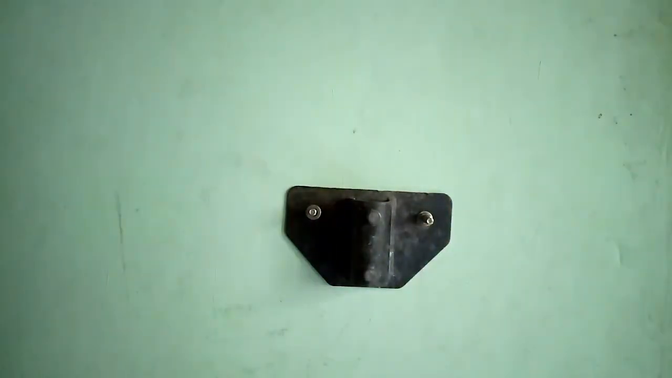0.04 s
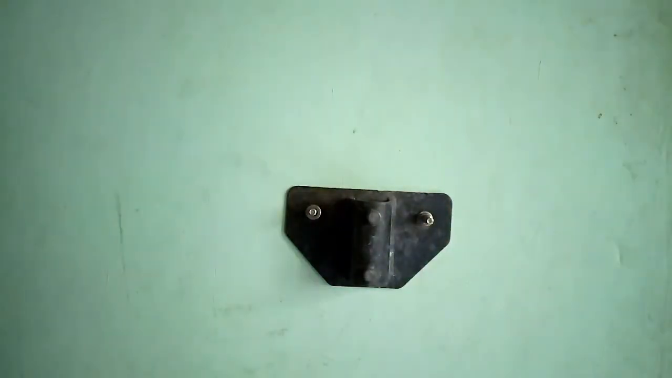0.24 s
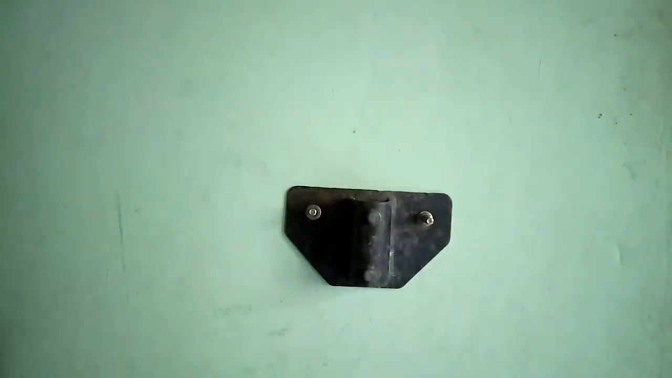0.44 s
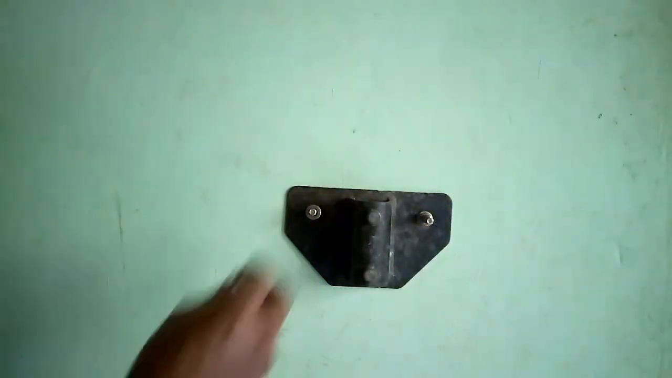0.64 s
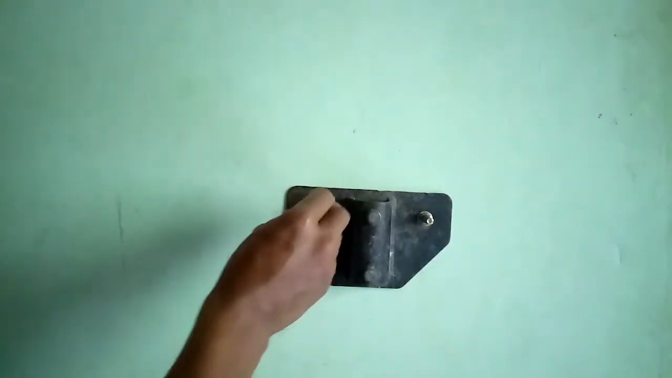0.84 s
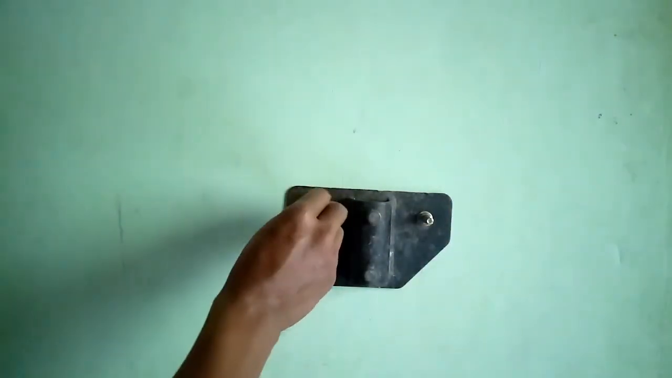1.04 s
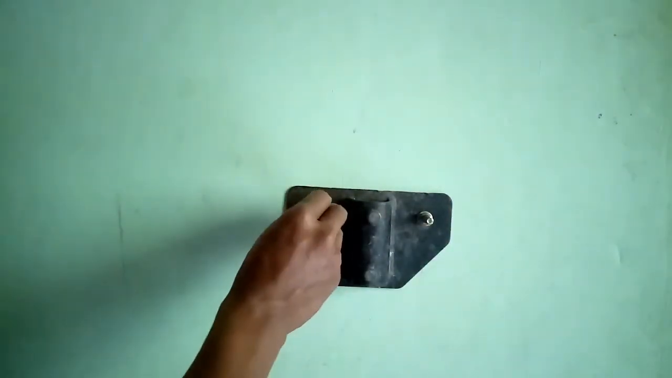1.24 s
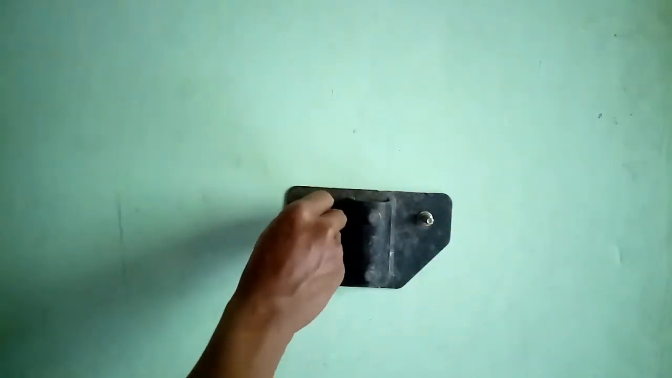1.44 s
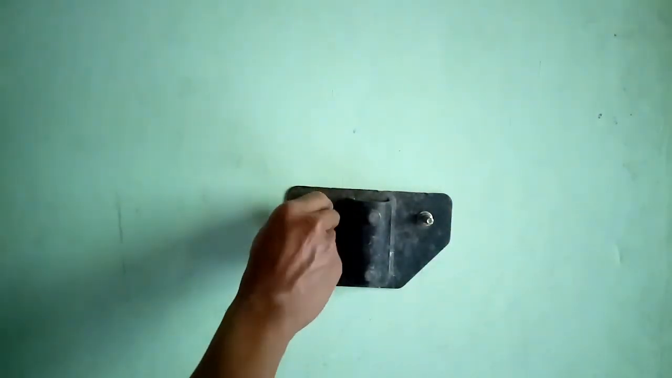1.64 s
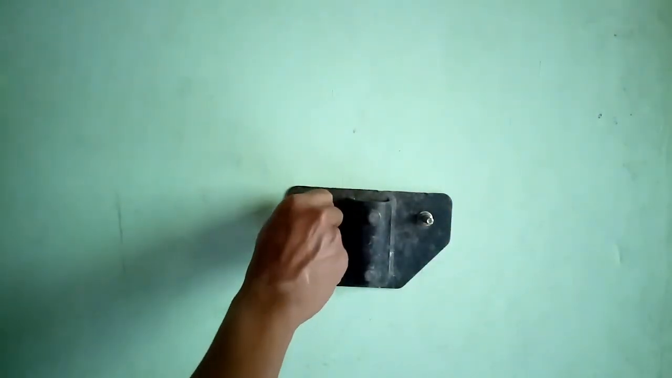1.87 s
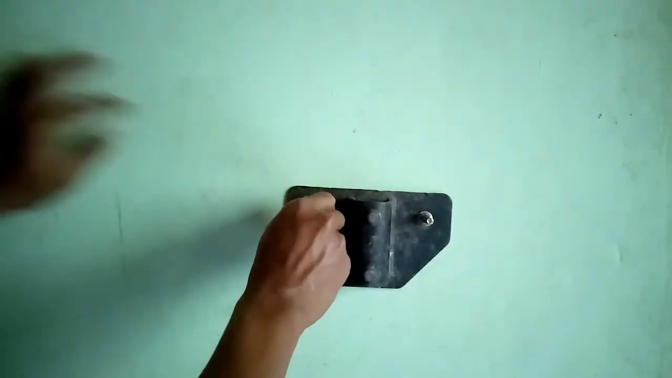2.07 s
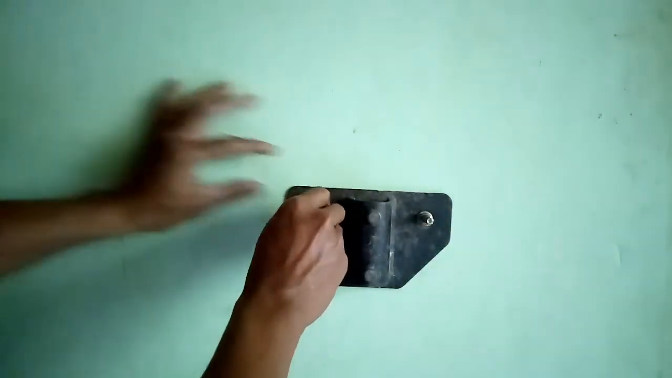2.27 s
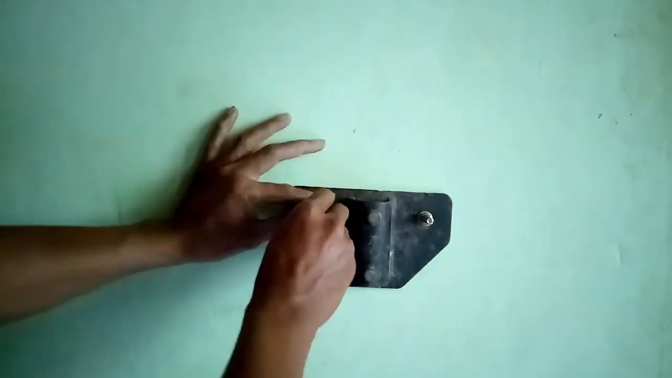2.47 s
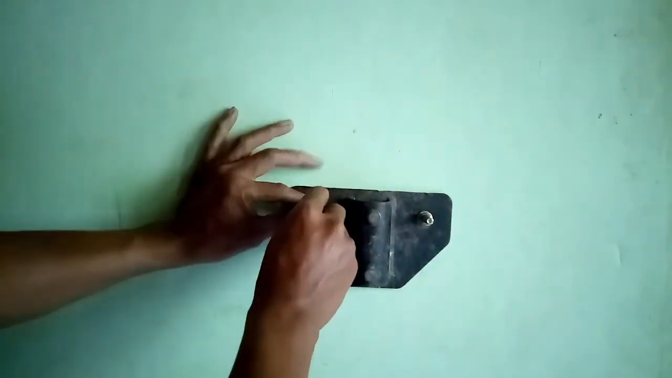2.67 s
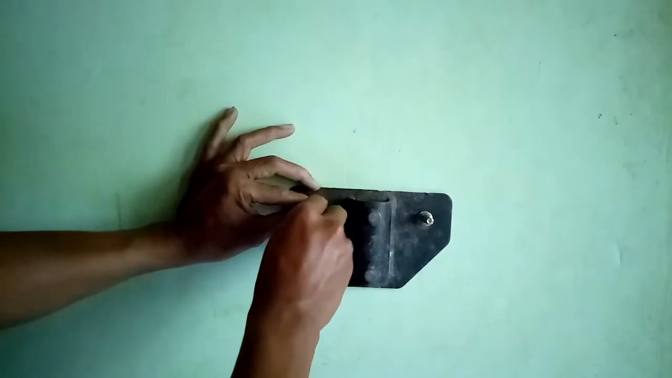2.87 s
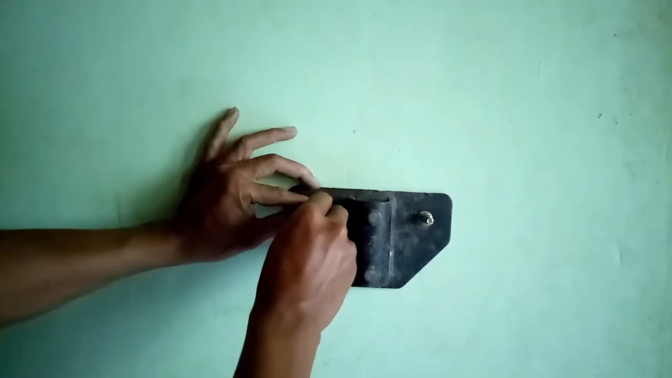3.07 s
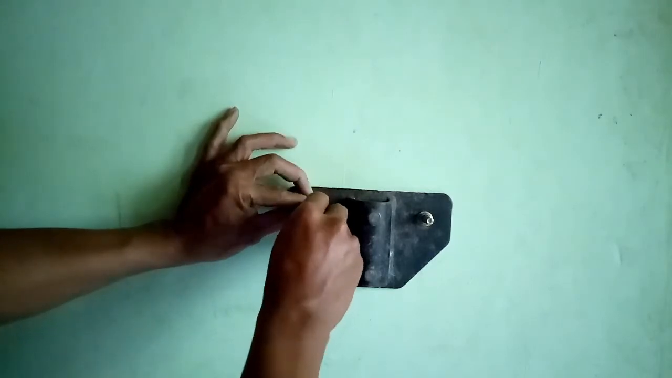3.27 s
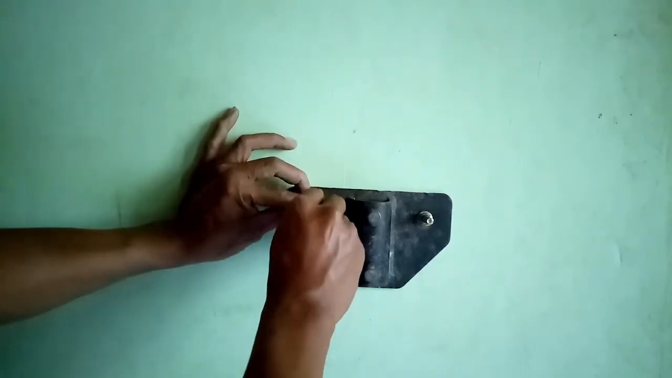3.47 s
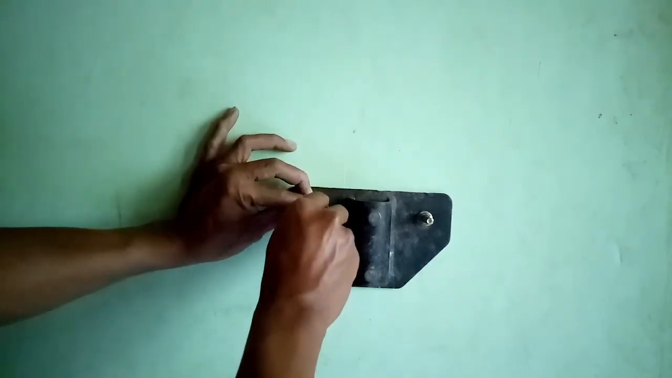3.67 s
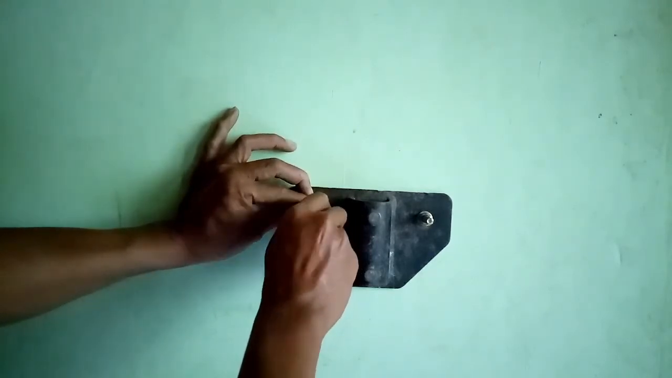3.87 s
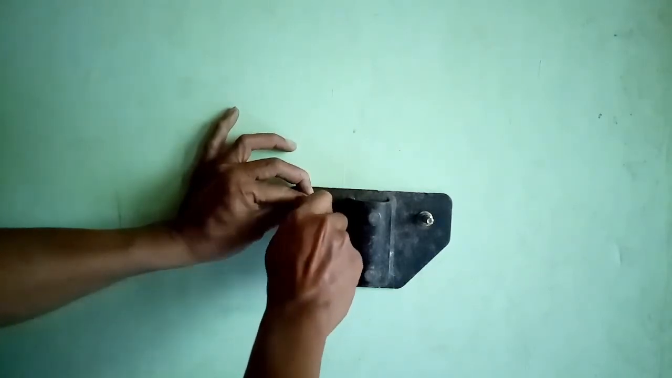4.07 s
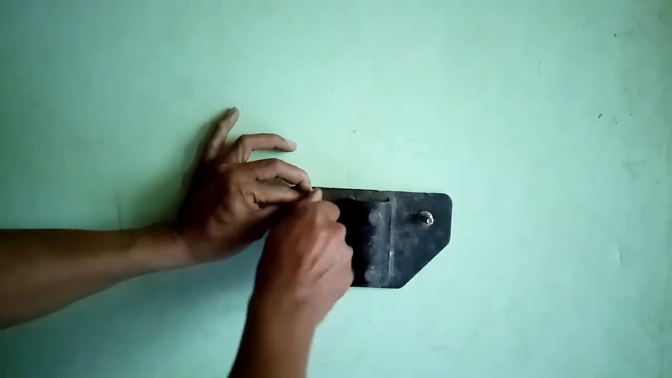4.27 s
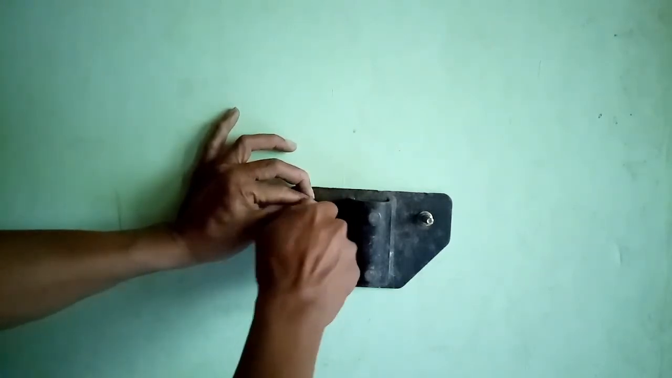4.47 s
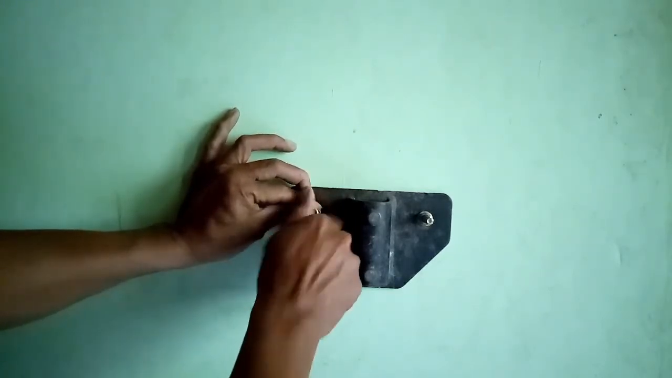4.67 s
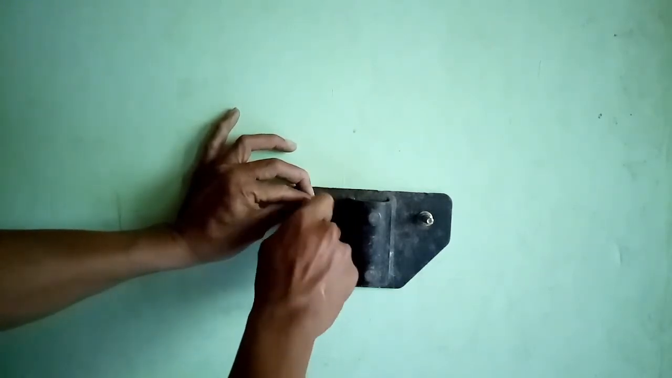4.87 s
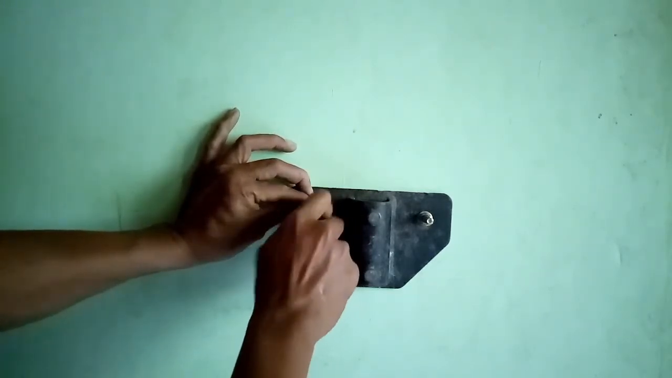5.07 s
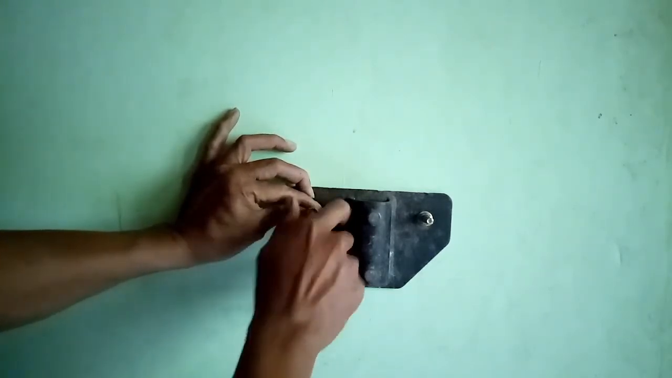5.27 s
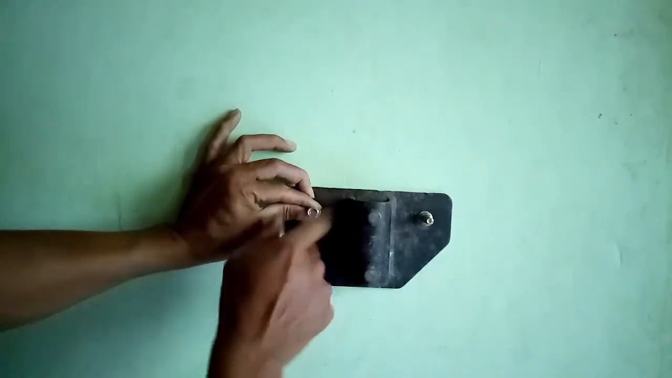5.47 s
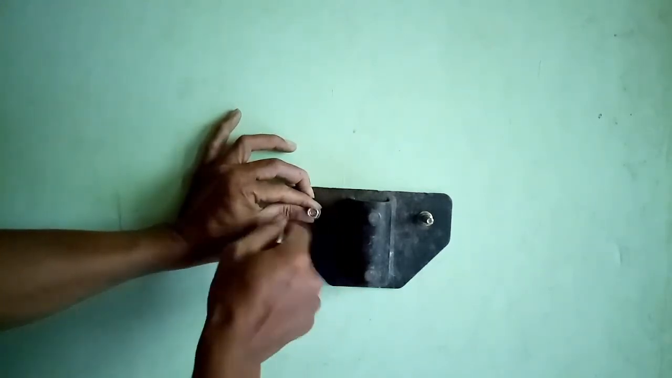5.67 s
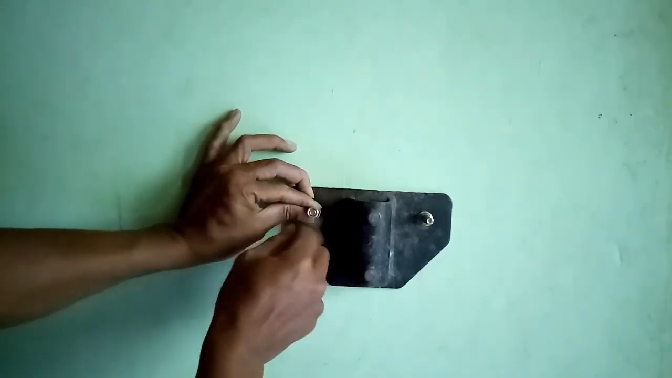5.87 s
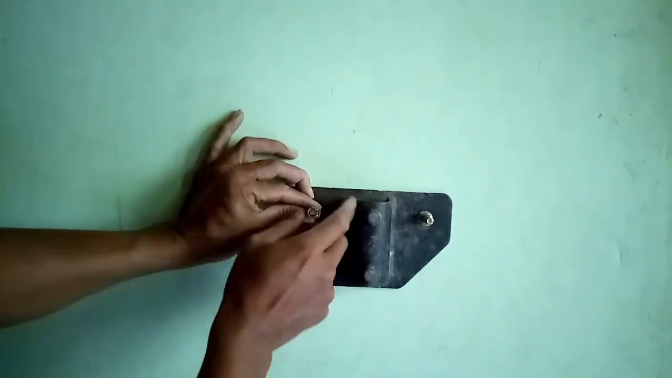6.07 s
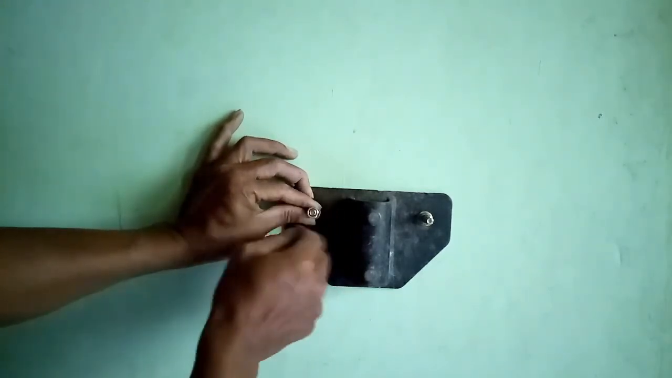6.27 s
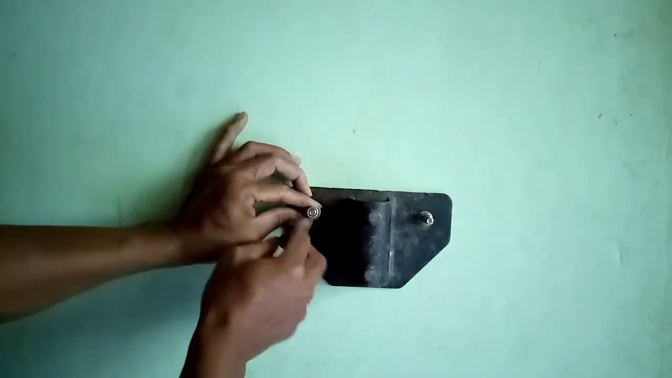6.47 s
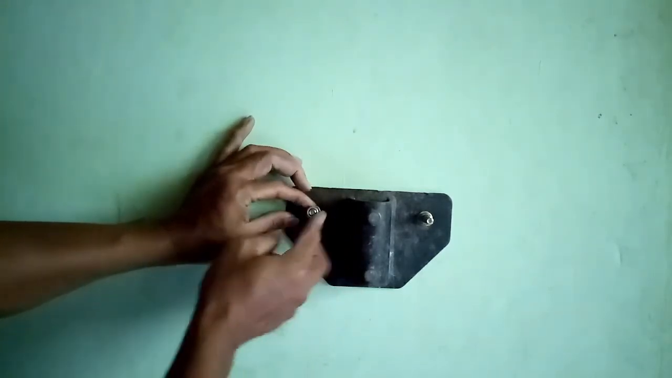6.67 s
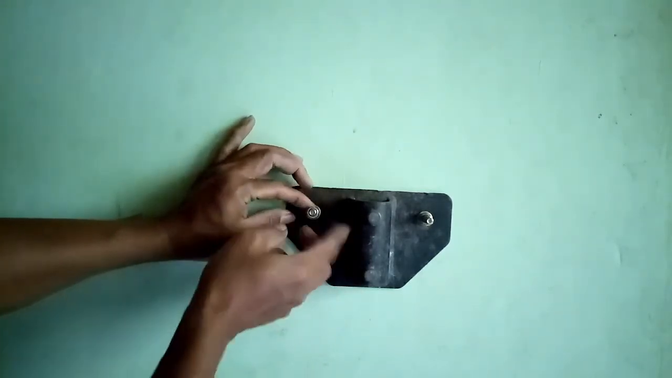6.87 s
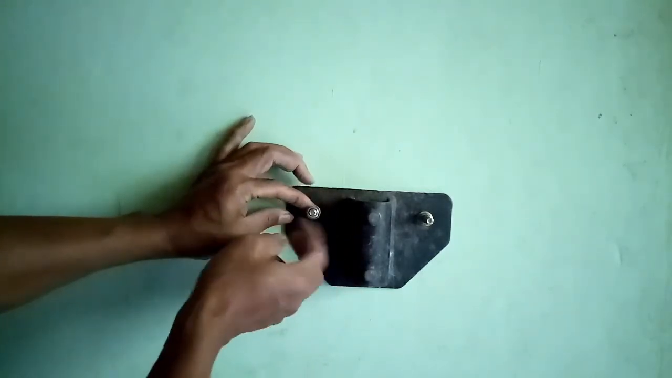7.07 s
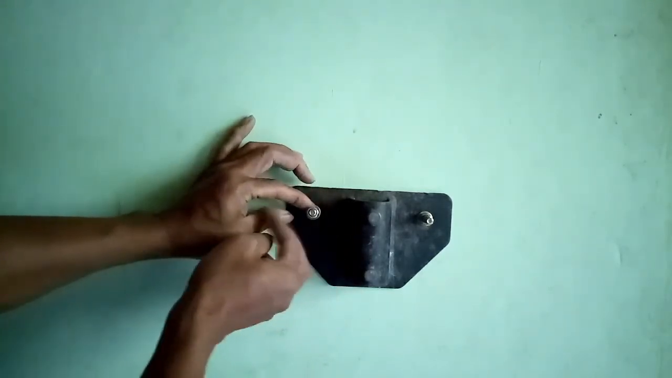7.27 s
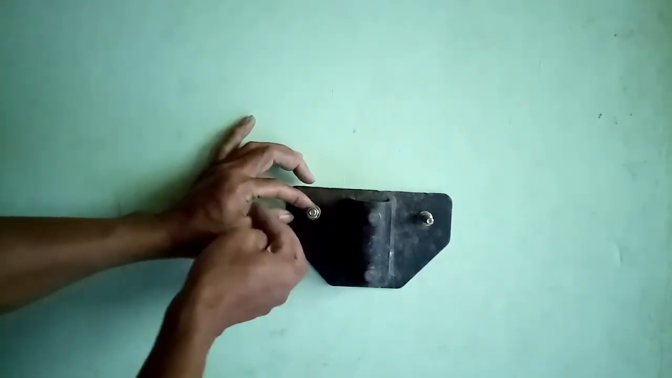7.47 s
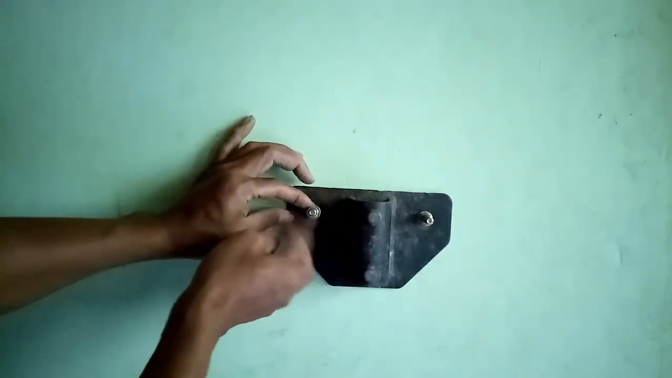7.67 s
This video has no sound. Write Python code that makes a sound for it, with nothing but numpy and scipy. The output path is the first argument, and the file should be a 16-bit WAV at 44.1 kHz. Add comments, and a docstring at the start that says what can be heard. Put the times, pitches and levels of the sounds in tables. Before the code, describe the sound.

A nut is worked by hand onto a bolt on a steel wall plate, in a bare room with a faint steady hush and short reverberation. From about 0.8 seconds, light, irregular clinks sound as the nut meets the bolt tip, with a clearer one at 1.1 and faint finger rubbing in between. Each hit is a dry clack with a brief, high steel ring. Two sharp, loud clacks land at 3.1 and 3.4 seconds. A faint, muffled low drone swells near 3.8 and more weakly near 4.4, among a few smaller clicks. From 5 seconds to the end, around 7.7, the nut is flicked along the thread: finger ticks alternate with very short rattles, strongest near 5.5, 6, 7.1, 7.3 and 7.5 seconds. After 6.7 they crowd closer together and carry a thin, very high shimmer.

```python
"""A nut on an anchor bolt

In a bare, quiet room a nut is worked by hand onto a bolt that holds a steel plate to a wall. It clinks
against the tip as fingers rub the steel; then it is flicked along the thread: a tick as the finger
catches it, and a rattle whose blows come faster and harder. Each impact gives a damped clack and
excites the modes of the steel. A low muffled drone swells twice."""
import sys
import numpy as np
from scipy import signal
from scipy.fft import rfft, irfft
from scipy.io import wavfile
from scipy.ndimage import uniform_filter1d

SR = 44100
rng = np.random.default_rng(int(sys.argv[2]) if len(sys.argv) > 2 else 0)


def unload_wav(signal):
    """Save mono or channel-first audio to the path in sys.argv[1] as 16-bit WAV at rate SR, clipped to [-1, 1]."""
    wavfile.write(
        sys.argv[1],
        SR,
        np.round(np.clip(np.atleast_2d(signal).T, -1, 1) * 32767).astype(np.int16),
    )


N = 340893
LEAD_S = .02  # time left for the faint swell of noise that softens the start of each blow
THREADED_S, SPINNING_S = 4.0, 6.7  # the nut has caught the thread; it spins freely

# The nut feels for the thread. Each row: time in seconds, level in dB, chatter time in seconds, contact
# pitch in Hz, then in dB the colour at 6, 9 and 11.6 kHz, the relative ring and the resonance height.
CLINKS = [(0.85, -31.5, 0.0076, 5560, 5.5, -12, 4, -18, 8),
          (1.1237, -8, 0.0023, 3225, -6, -23, -27, -28, 15.5),
          (1.207, -17.5, 0.0049, 3220, -18, -27, -40, -17, 13),
          (1.438, -25.5, .004, 4750, 7, -6.5, 2, -5, -6),
          (1.456, -14.5, 0.013, 3950, -11, -23, -20, -15, 5),
          (1.513, -27.5, .0023, 3420, 8.5, -23, -14, -14, 13),
          (2.033, -22.5, 0.0012, 4200, -6, -13, -3, -6, 8), (2.228, -26, 0.0014, 4800, 7.5, -6, 6, -6, 5),
          (2.595, -15.5, 0.0019, 4200, 4.5, -6, -24.5, -3, 6.5),
          (2.615, -15, 0.00095, 4270, 1, -10, 4, -8.5, 7), (2.928, -37, 0.0013, 5300, 9.5, -9.5, 3, -5, 3),
          (3.078, -17, .001, 4020, -2, -9, -31, -32, 10),
          (3.0943, 5.5, 0.00072, 4180, 1.5, -3, -11, -5.5, 5),
          (3.382, -0.5, 0.0018, 2640, -6.5, -14.5, -15.5, -32, 2.5),
          (4.136, -37.5, 0.0013, 2940, -26, 3, -1, -1, 15),
          (4.3078, -11, 0.00033, 4260, 2.5, -2, -10, -12, 0.5),
          (4.528, -14, 0.0016, 3400, 2, -20, -11, -10, -3.5),
          (4.642, -28, .0028, 3770, -3, -26, -24, -4, 14),
          (4.722, -29.5, 0.0037, 3700, 9, -13, -21, -4, 16)]
def nut(tail_count=5, size=18000):
    """Impact excitation: every clink, tick and rattle is a clack plus the free vibration of the steel."""
    since, hz = np.arange(size) / SR - LEAD_S, np.fft.rfftfreq(size, 1 / SR)
    _, tip_db, thread_db, _ = np.transpose(STEEL_MODES)
    tip = steel_ring(since, hz, tip_db, hollow=0.12)
    thread = steel_ring(since, hz, thread_db, hollow=0.39)
    groups = np.zeros((tail_count, N))  # contacts take turns among five room tails, so no pitch stands out
    for k, (s, *strike) in enumerate([*CLINKS, *ticks(), *rattles()]):
        clack, ring = contact(since, hz, *(thread if s > THREADED_S else tip), *strike)
        if s > SPINNING_S:
            ring = ring + shiver(clack, since, hz)
        add(groups[k % tail_count], s - LEAD_S, clack + ring)
    return sum(room(group) for group in groups)

# A finger catches the nut. Each row: time in seconds, level in dB, chatter time in seconds,
# contact pitch in Hz, colour in dB at 6 kHz and at 11.6 kHz.
TICKS = [(5.052, -9, 0.0014, 3160, -9, -33), (5.281, -22.5, 0.0011, 2500, 0, -34),
         (5.412, -15.5, .002, 3770, 1, -34), (5.5678, -3, 0.00048, 2530, -1, -4),
         (5.675, -3, 0.0005, 2440, -4.5, -5), (5.738, -19.5, 0.00089, 2410, 0.5, -16),
         (5.922, -21, 0.0043, 2580, 2, -52), (6.2264, -7, 0.001, 3190, -1.5, -8.5),
         (6.4995, -1.5, 0.0022, 2980, -2.5, -10.5), (6.741, -13.5, 0.0037, 3430, 1.5, 1.5),
         (7.0123, -7, .0004, 3380, 0.5, -5.5), (7.2527, -12.5, 0.0011, 2500, 5, -6),
         (7.4061, -4.5, 0.00027, 2130, -0.5, 2), (7.4852, -10.5, 0.0015, 2550, 6, 3),
         (7.7235, -6, 0.00034, 2980, 0.5, 5)]
def ticks():
    """Impulsive excitation: each catch of the finger is a single blow on the thread."""
    for tick in TICKS:
        yield on_thread(*tick, hump_db=3, full_ring_db=-13)

# The flicked nut rattles. Each row: time of the hardest blow in seconds, its level in dB,
# run-up in seconds, contact pitch in Hz, colour in dB at 6 kHz and at 11.6 kHz.
RATTLES = [(5.096, -11.5, 0.0077, 2120, -4, -26), (5.1509, -7.5, .018, 2270, -4, -22),
           (5.471, 2.5, 0.032, 2040, -1.5, -5.5), (5.9887, 3.5, 0.02, 1940, -0.5, -3),
           (6.2714, -6.5, 0.011, 2350, -2.5, -10), (6.801, -3.5, 0.022, 2220, 1.5, -0.5),
           (7.082, 1.5, 0.017, 1800, -0.5, -2), (7.2878, 1, .009, 1990, 3, -2),
           (7.5209, 2, .017, 2200, -0.5, -3)]
def rattles(growth_db=11.5, jitter_s=.0005, chatter_s=0.003, soft_pitch_rise=0.17):
    """Repeated impact: three blows come closer and harder, the softer ones resonating higher."""
    for s, level_db, run_up, pitch_hz, treble_db, zing_db in RATTLES:
        for to_go in (1, 0.37, 0):  # share of the run-up still ahead
            at = s - to_go * (run_up + jitter_s * rng.standard_normal())
            blow_db = level_db - growth_db * np.sqrt(to_go)
            blow_hz = pitch_hz * (1 + soft_pitch_rise * to_go)
            yield on_thread(at, blow_db, chatter_s, blow_hz, treble_db, zing_db,
                            hump_db=-3.5, full_ring_db=-12.5)

def on_thread(s, level_db, chatter_s, pitch_hz, treble_db, zing_db, hump_db, full_ring_db):
    """Nonlinear contact: the harder a blow on the thread, the smaller the share of ring to clack."""
    top_db = -14 + 0.17 * zing_db
    ring_db = full_ring_db - 0.5 * level_db
    return s, level_db, chatter_s, pitch_hz, treble_db, top_db, zing_db, ring_db, hump_db

def contact(since, hz, steel, hollow_db, level_db, chatter_s, pitch_hz, treble_db, top_db, zing_db,
            ring_db, hump_db, clack_t60=0.028):
    """Source and filter: one blow gives a clack, damped at once by the fingers, and a longer ring."""
    knock = rng.standard_normal(len(since)) * gain_of(-60 * (since + LEAD_S) / clack_t60)
    clack = signal.fftconvolve(contact_force(since, chatter_s), knock)[:len(since)]
    clack = unit_rms(clack) / np.sqrt(len(since))
    # the contact resonates just above its pitch and moves lower modes poorly
    octaves = np.log2((hz + 1) / pitch_hz)
    below = np.maximum(-octaves, 0)
    low_cut_db = np.maximum(-(44 + 4 * max(hump_db, 0)) * below, -23 - 7 * below)
    peak_db = hump_db * np.exp(-((octaves - .16) / .17) ** 2)
    # the treble steps down above 7 kHz and rises again where loose metal shivers
    colour_db = curve_at([(5200, 0.0021), (6000, treble_db), (6950, treble_db),
                          (7500, top_db - 1.5), (8300, top_db - 3), (10200, top_db - 1.5),
                          (11600, zing_db), (12600, zing_db - 12), (15000, zing_db - 27)], hz)
    clack = irfft(rfft(clack) * minimum_phase(colour_db + low_cut_db + peak_db + hollow_db))
    ring = irfft(steel * minimum_phase(0.96 * colour_db - 12 * below)) * gain_of(ring_db - 6)
    return gain_of(level_db) * clack, gain_of(level_db) * ring

def contact_force(since, chatter_s, bounces_per_s=4000, swell_s=0.0062):
    """Contact chatter: an impulse, its start softened by a faint swell of noise, then tiny rebounds."""
    age = np.maximum(since, 0) / chatter_s
    envelope = .45 * age * np.exp(1 - age) + 0.073 * np.exp(-abs(since) / swell_s)
    force = envelope * sparse_noise(len(since), bounces_per_s)
    force[np.argmin(abs(since))] = 1
    return force

# Modes of nut, bolt and plate. Each row: frequency in Hz, level in dB with the nut on the bolt's tip,
# level in dB with it on the thread, time to decay by 60 dB in seconds.
STEEL_MODES = [(899, -20, -7, .4), (1660, -25, -3, .25), (2133, 3, -2, .3), (2350, 4, -5, .2),
               (2635, -18, -1, .45), (2964, -20, -4, .45), (3007, -2, -6, .26), (3112, -22, -1, .45),
               (3478, -16, -4, .45), (4141, -9, 0, .45), (4543, 2, -7, .3), (4680, -5, -9, .45),
               (4759, -3, -5, .5), (5215, -1, -2, .45), (5781, -14, -3, .5), (6060, -5, -2, .45),
               (6379, -4, -12, .35), (6860, -9, -6, .4), (7930, -7, -8, .35), (8590, -6, -5, .35),
               (9459, -3, -4, .4), (9805, 3, 6, .33), (10126, -5, -5, .4), (10330, -5, -10, .3),
               (11120, 0, 1, .32), (11930, -7, -12, .25), (13450, -2, -14, .25)]
def steel_ring(since, hz, mode_db, hollow, width_hz=70):
    """Modal superposition: the spectrum of the damped modes, and the colour in dB they lend a clack."""
    mode_hz, _, _, t60 = np.transpose(STEEL_MODES)[:, :, None]
    after, mode_db = np.maximum(since, 0), mode_db[:, None]
    ring = (gain_of(mode_db - 60 * after / t60) * np.sin(2 * np.pi * mode_hz * after)).sum(0)
    peaks = gain_of(mode_db) / (1 + ((hz - mode_hz) / width_hz) ** 2)
    crowding = (peaks.sum(0) + 0.047) ** hollow
    crowding /= crowding[(hz > 3000) & (hz < 7000)].mean()
    return rfft(ring / np.linalg.norm(ring)), 10 * np.log10(crowding)

def shiver(clack, since, hz, centre_hz=11600, width_hz=260, t60=0.51):
    """Narrow-band resonance: loose metal on the thread keeps shivering after a clack."""
    tail = rng.standard_normal(len(since)) * gain_of(-60 * np.maximum(since, 0) / t60)
    band = 1 / (1 + 1j * (hz - centre_hz) / width_hz) ** 2
    return gain_of(-7) * irfft(rfft(clack) * rfft(tail / np.linalg.norm(tail)) * band)

# Spectrum of the grinding thread. Each row: frequency in Hz, relative level in dB.
SCRAPE_COLOUR = [(500, -23.5), (900, -15.5), (1150, -14.5), (1450, -4.5), (1700, 4.5), (1950, -2),
                 (2600, 10), (4000, 12), (6500, -17.5), (7600, -28), (11500, -25), (15000, -38)]
def scrape(grains_per_s=1800, lead_s=0.05, length_s=0.12, relative_db=-50.5):
    """Sliding friction: the thread grinds in fine grains as the nut spins, swelling with each rattle."""
    grains = coloured(sparse_noise(N, grains_per_s), SCRAPE_COLOUR)
    spins = [(s - lead_s, length_s, db + relative_db) for s, db, *_ in RATTLES]
    return swells(spins, peak=0.4, sharpness=2) * grains

# Fingers stroke the steel. Each row: start in seconds, length in seconds, relative level in dB.
STROKES = [(.25, 0.53, -66), (.79, 0.11, -53), (1.42, 0.1, -50.5), (1.95, 0.26, -47), (2.15, 0.76, -54),
           (2.6, 0.095, -57.5), (4.42, 0.35, -57.5), (4.95, 0.38, -61.5)]
# Spectrum of the rubbing. Each row: frequency in Hz, relative level in dB.
RUB_COLOUR = [(1500, -22.5), (3000, -14.5), (4000, -7), (4450, -3), (4900, -7), (6200, 5), (7000, -1),
              (8200, -22), (11800, -11.5), (15000, -39)]
def fingers(grains_per_s=1500, shift_db=4):
    """Stick-slip friction: skin and thread catch in tiny grains, whose resonances shift with the grip."""
    grains = (rng.random(N) < grains_per_s / SR) * rng.choice([-1, 1], N)
    spectra = signal.stft(grains, SR, nperseg=512)[2]
    patches = uniform_filter1d(rng.standard_normal(spectra.shape), size=4, axis=0)
    patches = unit_rms(uniform_filter1d(patches, size=12, axis=1))  # smooth in frequency and time
    grains = signal.istft(spectra * gain_of(shift_db * patches), SR, nperseg=512)[1][:N]
    pressure = swells(STROKES, peak=0.4, sharpness=1.1)
    return gain_of(-13.5) * pressure * coloured(grains, RUB_COLOUR)

def rubbed_steel(grains, ring_db=-10, size=18000):
    """Forced vibration: rubbing also sets the modes of the steel ringing faintly."""
    since, hz = np.arange(size) / SR, np.fft.rfftfreq(size, 1 / SR)
    tip_db = np.transpose(STEEL_MODES)[1]
    ring, _ = steel_ring(since, hz, tip_db, hollow=0)
    return grains + gain_of(ring_db) * signal.fftconvolve(grains, irfft(ring))[:N]

# Faint, brief tones as the steel is rubbed and handled.
# Each row: start in seconds, length in seconds, pitch in Hz, level in dB.
HANDLING_TONES = [(.3, 0.17, 6070, -74), (0.365, .19, 1710, -69), (.84, 0.15, 5930, -70.5),
                  (1.42, 0.15, 10040, -69.5), (1.64, 0.14, 4370, -73.5), (1.95, 0.32, 1547, -65),
                  (2.42, 0.13, 4500, -72), (2.59, 0.18, 11300, -73), (4.27, 0.14, 2670, -64),
                  (4.58, 0.17, 4330, -64), (4.8, .26, 4150, -74), (4.84, 0.18, 2470, -75.5),
                  (4.98, 0.26, 893, -70.5), (5.06, 0.13, 1690, -64)]
# The hands bump softly. Each row: start in seconds, length in seconds, pitch in Hz, level in dB.
BUMPS = [(.33, 0.12, 263, -70.5), (6.19, 0.11, 307, -72.5), (7.29, .14, 340, -66)]
def handling(rows, width_hz):
    """Narrow-band noise: each row is a brief, fuzzy tone that swells and fades."""
    out, hz = np.zeros(N), np.fft.rfftfreq(SR, 1 / SR)
    for s, length, pitch_hz, db in rows:
        band = rfft(rng.standard_normal(SR)) / (1 + ((hz - pitch_hz) / width_hz) ** 2)
        tone = unit_rms(irfft(band)[:int(length * SR)])
        add(out, s, gain_of(db) * tone * np.hanning(len(tone)))
    return out

# The muffled drone swells. Each row: start in seconds, length in seconds, level in dB.
DRONE_SWELLS = [(3.61, 0.33, -50.5), (3.85, 0.52, -76), (4.24, 0.35, -62)]
# Spectrum of the drone. Each row: frequency in Hz, relative level in dB.
DRONE_COLOUR = [(30, -24.5), (110, -32), (185, -12.5), (210, -6.5), (235, 0), (265, 0), (285, -20),
                (340, -21), (600, -60)]
def drone(steadiness=0.45):
    """Envelope fluctuation: a narrow band of low noise flutters, partly steadied, as it swells."""
    band = coloured(rng.standard_normal(N), DRONE_COLOUR)
    flutter = np.sqrt(abs(uniform_filter1d(band ** 2, size=2200)) + 1e-9)
    return swells(DRONE_SWELLS, peak=0.47, sharpness=1.53) * unit_rms(band / flutter ** steadiness)

# Decay of the bare room. Each row: frequency in Hz, reverberation time in seconds.
ROOM_T60 = [(500, 0.61), (2500, 0.48), (5000, 0.48), (7000, 0.41), (11000, 0.24), (15000, 0.25)]
def room(x, wet_db=-6.0, gap_s=0.00032, build_s=0.00045):
    """Reverberation: bare walls return dense reflections, each band dying at its own rate."""
    hz, t, spectra = signal.stft(sparse_noise(SR, per_s=5000), SR, nperseg=256)
    decay = gain_of(-60 * t / curve_at(ROOM_T60, hz)[:, None])
    tail = signal.istft(spectra * decay, SR, nperseg=256)[1]
    tail *= 1 - np.exp(-np.maximum(np.arange(len(tail)) / SR - gap_s, 0) / build_s)
    return x + gain_of(wet_db) * signal.fftconvolve(x, tail / np.linalg.norm(tail))[:N]

# Spectrum of the room tone. Each row: frequency in Hz, relative spectral density in dB.
AIR_COLOUR = [(15, -59), (25, -25.5), (62, -7), (91, -2.5), (144, -4.5), (482, -12), (648, -12),
              (1490, -17.5), (1750, -18), (2560, -18.5), (5280, -24), (7500, -30.5), (10100, -35.5),
              (11800, -34), (15500, -36)]
def room_tone(level_db=-70):
    """Stationary noise: a faint, steady hush, strongest in the bass."""
    return gain_of(level_db) * coloured(rng.standard_normal(N), AIR_COLOUR)

def gain_of(db):
    """Decibels as an amplitude ratio."""
    return 10 ** (np.asarray(db) / 20)

def unit_rms(x):
    """Normalisation to an rms of 1."""
    return x / np.sqrt(np.mean(x ** 2) + 1e-20)

def curve_at(points, hz):
    """Interpolation on a log-frequency axis."""
    f, value = np.transpose(points)
    return np.interp(np.log(hz + 1), np.log(f + 1), value)

def add(mix, s, sound):
    """Superposition of a sound on the mix at time s."""
    part = mix[max(round(s * SR), 0):][:len(sound)]
    part += sound[:len(part)]

def sparse_noise(size, per_s):
    """Shot noise: impulses of random time and strength."""
    return rng.standard_normal(size) * (rng.random(size) < per_s / SR)

def coloured(x, points):
    """Spectral shaping, at an rms of 1."""
    response = gain_of(curve_at(points, np.fft.rfftfreq(len(x), 1 / SR)))
    return unit_rms(irfft(rfft(x) * response, len(x)))

def minimum_phase(db):
    """Causality: the response with these gains that does not sound before it is struck."""
    log_gain = np.log(gain_of(np.maximum(db, -100)))
    circle = np.concatenate([log_gain, log_gain[-2:0:-1]])
    return np.exp(np.conj(signal.hilbert(circle)))[:len(db)]

def swells(rows, peak, sharpness):
    """Amplitude envelope: each row rises to its level at the share `peak` of its length, then falls."""
    out = np.zeros(N)
    for s, length, db in rows:
        arch = np.interp(np.arange(0, length, 1 / SR) / length, [0, peak, 1], [0, 1, 0])
        add(out, s, gain_of(db) * np.sin(np.pi / 2 * arch) ** sharpness)
    return out

def scene():
    """Superposition: the nut, the hands, the drone and the room tone add in one channel."""
    air = room_tone()
    friction = room(rubbed_steel(fingers()) + scrape())
    hands = handling(HANDLING_TONES, width_hz=45) + handling(BUMPS, width_hz=26)
    return (nut() + friction + hands + drone() + air)[None]

def record(dry, edge_hz=15600):
    """Band limiting: a steep low-pass filter removes the highest treble."""
    low_pass = signal.firwin(511, edge_hz, window=("kaiser", 9), fs=SR)
    return signal.oaconvolve(dry, low_pass[None], "same")

dry = scene()
out = record(dry)
unload_wav(out)
```